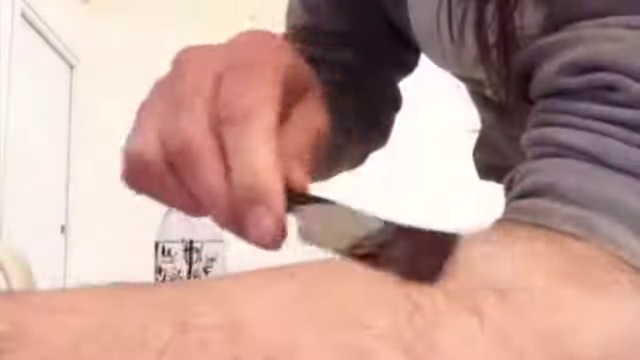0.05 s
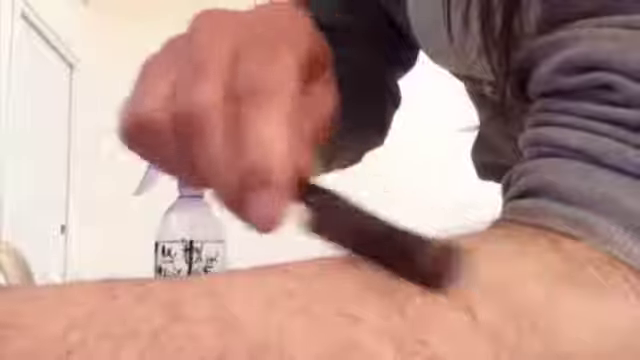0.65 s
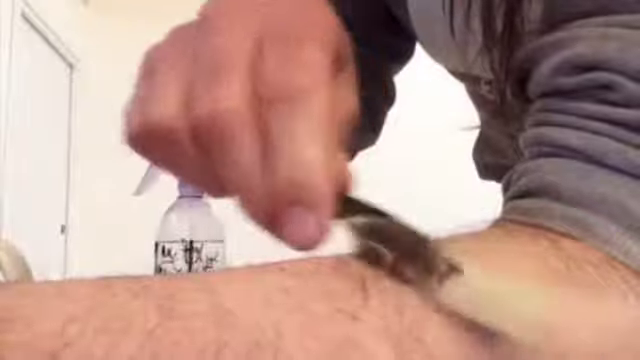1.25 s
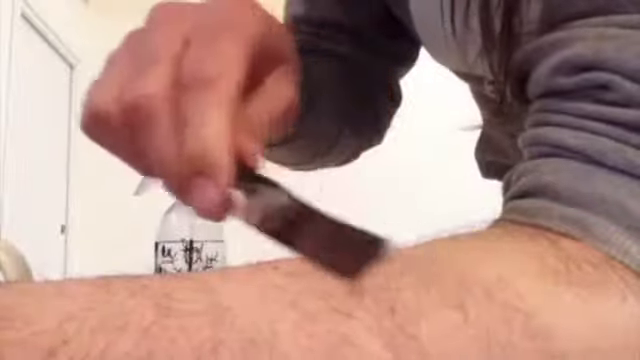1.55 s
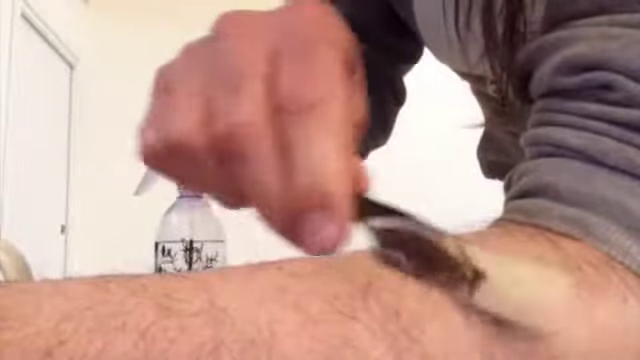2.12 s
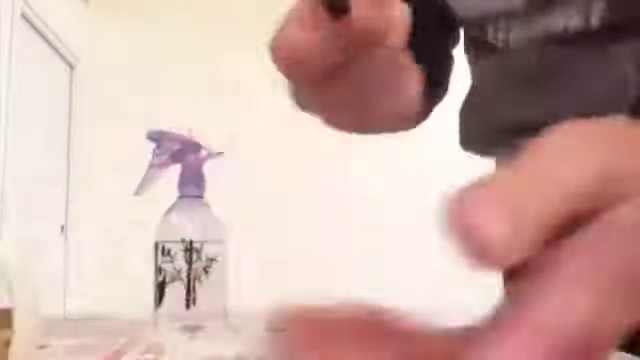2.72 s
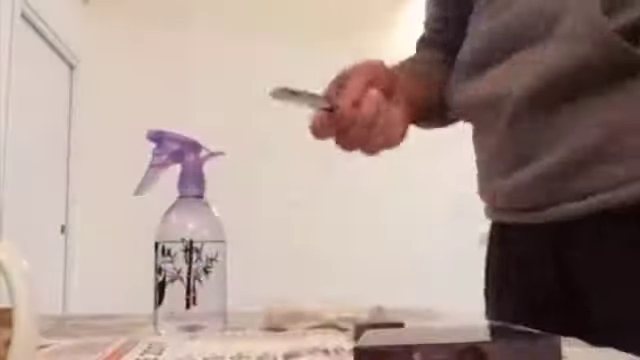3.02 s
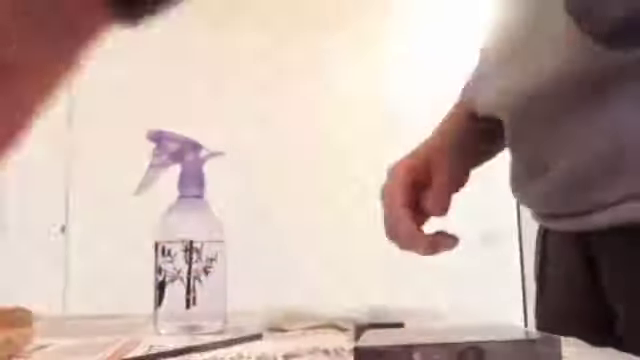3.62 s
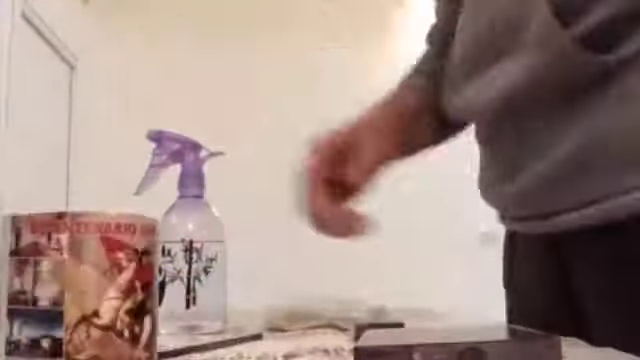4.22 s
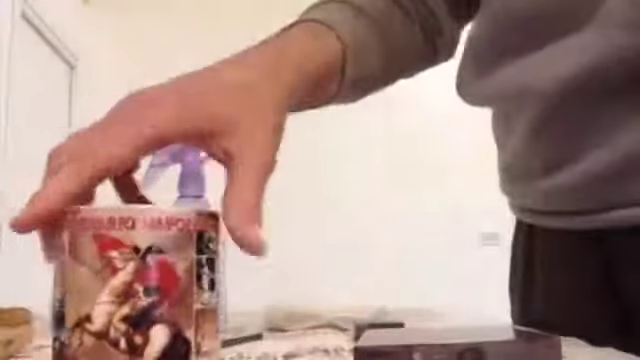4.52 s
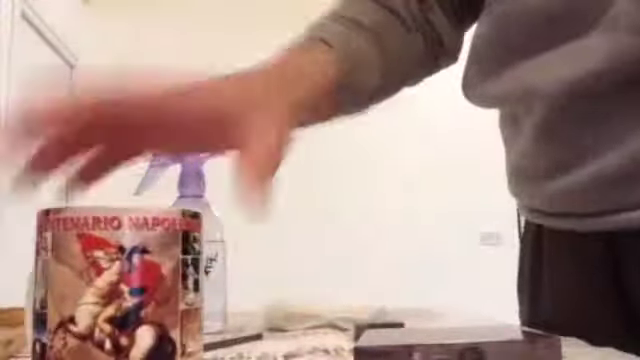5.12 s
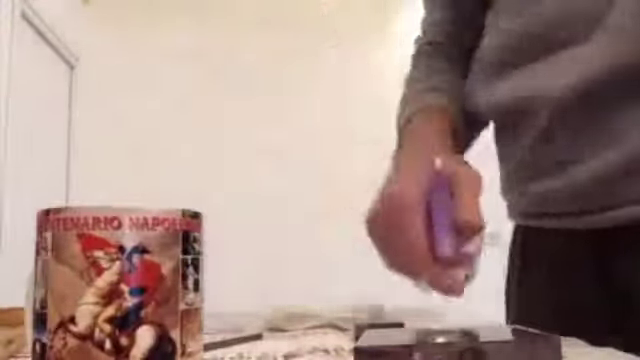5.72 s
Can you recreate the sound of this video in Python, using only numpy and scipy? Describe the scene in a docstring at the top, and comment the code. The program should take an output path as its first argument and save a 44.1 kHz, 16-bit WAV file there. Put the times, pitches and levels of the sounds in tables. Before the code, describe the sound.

A straight razor shaves forearm hair close to the microphone in a small room with low, steady background noise. From the start until about 2.2 seconds come runs of faint, very high hissing strokes, roughly eight to twelve a second, with a whisper of blade on skin and soft drags of the arm on a table. The blade catches with a small metallic tick at 1.1 seconds. A bump and a sharp click come near 2 seconds. At 2.5 seconds a short groaning scrape ends in the loudest sound, a hard knock on the table. Lighter scrapes and taps follow from 3 to 3.4 seconds as the razor is laid down. A sleeve sweeps past around 3.7 seconds. A mug bumps down at 4 seconds and slides faintly, with brief scrapes, until about 5.1. Near 5.7 seconds a plastic spray bottle clicks several times amid soft sleeve swishes.

```python
"""Razor on forearm hair

A straight razor shears hair in short hissing strokes, close to a microphone on a table in a small room.
The arm drags and bumps on the table top, driving its modes by stick-slip friction and by impact.
The razor is laid down and a plastic spray bottle is picked up, each clicking as a small hard shell;
a pushed mug resonates faintly, and sleeves swish past as their fibres rub."""
import sys
import numpy as np
from scipy import signal
from scipy.fft import rfft, irfft
from scipy.io import wavfile
from scipy.ndimage import uniform_filter1d

SR = 44100
rng = np.random.default_rng(int(sys.argv[2]) if len(sys.argv) > 2 else 0)


def materialize(psi):
    """Save the field psi as 16-bit PCM at rate SR to the path in sys.argv[1].

    A 1-D psi becomes a single channel; in a 2-D psi each row is a channel.
    """
    bounded = np.clip(np.atleast_2d(psi).T, -1, 1)
    quanta = np.round(bounded * 32767).astype(np.int16)
    wavfile.write(sys.argv[1], SR, quanta)


N = 262395
T = np.arange(N) / SR

# spectra of room noise, cut hair, rubbed skin and rubbed cloth: f/Hz, relative density level/dB
AIR_SPECTRUM = [(18, -74), (30, -53), (119, -17.5), (200, -3), (394, -14), (485, -11.5), (538, -11),
                (794, -10), (978, -20.5), (2190, -21), (3150, -25), (15000, -30)]
HAIR_SPECTRUM = [(5000, -37), (8000, -5), (9800, -4.5), (10900, 2), (11700, -8), (12600, 8), (13500, 1),
                 (15500, -1)]
SKIN_SPECTRUM = [(500, -1), (1500, 6.5), (2500, 6.5), (4000, -1.5), (7000, -4.5), (15500, -4)]
CLOTH_SPECTRUM = [(150, -1), (800, 1), (1600, 6), (2700, 1.5), (5500, -6), (8500, -1.5), (11500, 3.5),
                  (15000, -5.5)]
# modes of the table top, the razor steel and the razor or bottle shell: f/Hz, level/dB, T60/s
TABLE_MODES = [(87, -4, 0.058), (144, -38, 0.045), (188, -3.5, 0.044), (245, 0.5, 0.026), (325, 21, 0.015),
               (399.2, 0, 0.084), (452, -5, 0.046), (606.5, 3, 0.12), (860, -11, 0.042), (1310, -4, .03)]
STEEL_MODES = [(1310, 2, 0.074), (2227, 4.5, 0.025), (2370, -9, 0.021), (3626, -6.5, 0.041)]
SHELL_MODES = [(1220, -1, 0.031), (1740, -28, 0.0043), (2245, 17.5, 0.037), (2527, 27, 0.0045),
               (3490, -18, 0.054)]
# bouts of even razor strokes: start/s, end/s, rate/Hz, stroke length/s, start level/dB, end level/dB
STROKE_BOUTS = [(0.037, .72, 8.25, 0.036, -65.5, -69.5), (0.789, 1.02, 10.7, 0.031, -65.5, -68),
                (1.16, 1.5, 7.64, 0.1, -71, -76), (1.693, 1.92, 11.9, 0.039, -74, -61.5),
                (1.998, 2.18, 9.1, 0.044, -68.5, -70)]
# drags on the table: t/s, length/s, groan level/dB, weight (thud re groan)/dB, grit re groan/dB
TABLE_DRAGS = [(0.191, .061, -45.5, -2.5, -5.5), (0.261, 0.081, -55, -4.5, -6.5),
               (0.463, 0.028, -59, -11, 0), (0.604, 0.025, -70.5, 0, 7.5), (0.736, 0.023, -57.5, -2, -4.5),
               (1.125, .024, -58.5, -5.5, 11), (1.933, 0.028, -41, -1.5, -12), (1.96, 0.028, -42, 1, -5),
               (2.07, 0.01, -61, -19, 0), (2.389, 0.083, -65, 8, -11), (2.476, 0.037, -34.5, -16.5, -12.5),
               (2.511, 0.048, -29.5, -26.5, -20.5), (2.574, 0.04, -38, -11.5, -13.5),
               (2.746, 0.037, -53, -16, 1), (2.941, 0.05, -51.5, 2, -7.5), (2.998, 0.045, -58.5, -10, -1),
               (3.225, 0.059, -45, -14.5, -2.5), (3.315, 0.04, -45, -9, -4), (3.374, 0.032, -43, -15, -4),
               (3.402, .03, -52.5, -8, -1.5), (3.766, 0.085, -42.5, -17, -4), (4.035, 0.013, -54, -1, -13),
               (4.517, 0.03, -55, -3, -12), (4.552, 0.086, -50.5, -0.5, -9.5),
               (4.635, 0.021, -41.5, -9, -28), (4.815, 0.022, -63, -15, 2.5), (5.384, .028, -52.5, -10, -8),
               (5.565, 0.02, -65.5, -12, 9)]
# blows on the table: t/s, peak level/dB, contact time/ms
TABLE_BLOWS = [(0.73, -45.5, 1.4), (1.38, -57.5, 1.1), (1.948, -38, 1.4), (2.587, -17, 0.69),
               (2.592, -16.5, 1.5), (3.015, -45, 0.71), (3.4, -38.5, 0.39), (4.04, -43, 2),
               (4.152, -56.5, 1.6), (5.236, -50.5, 1.2), (5.758, -48.5, 0.51)]
# sliding contacts of blade on skin, cloth on cloth and mug on table: t/s, length/s, level/dB
SKIN_GLIDES = [(0.36, 0.63, -70.5), (0.865, 0.017, -65.5), (1.01, .1, -64), (1.305, 0.026, -66.5),
               (1.428, 0.097, -69.5), (1.638, 0.013, -70), (2.205, 0.027, -68)]
SLEEVE_SWISHES = [(2.58, .03, -60), (3.828, 0.014, -59), (3.987, .046, -60.5), (4.368, 0.031, -61),
                  (4.41, .096, -68), (4.703, .016, -65), (4.967, 0.017, -65.5), (5.405, 0.036, -65.5),
                  (5.568, 0.021, -59), (5.72, 0.058, -68), (5.873, 0.065, -64.5)]
MUG_SLIDES = [(3.99, 0.035, -65.5), (4.37, 0.65, -80), (5.065, .05, -75)]
# clicks of razor and bottle: t/s, body peak level/dB, snap peak level/dB
SHELL_CLICKS = [(1.962, -24.5, -60), (2.584, -42.5, -56), (3.528, -53.5, -59), (5.139, -54.5, -63),
                (5.691, -46, -54), (5.7064, -48, -33), (5.7582, -48.5, -39.5), (5.799, -53.5, -50)]
# envelope of a sleeve sweeping close past the microphone: t/s, level/dB
SLEEVE_SWEEP = [(3.47, -93), (3.535, -62), (3.575, -60), (3.62, -64.5), (3.66, -52), (3.70, -55),
                (3.735, -53), (3.75, -61.5), (3.85, -87)]


def undb(db):
    """Amplitude ratio of a level in decibels."""
    return 10 ** (np.asarray(db) / 20)


def unit(x):
    """Normalisation to rms 1."""
    return x / np.sqrt(np.mean(x ** 2))


def at_peak(x, db):
    """Normalisation to a peak level."""
    return undb(db) * x / np.abs(x).max()


def add(out, start, x):
    """Superposition of x on out from start/s."""
    i = int(start * SR)
    out[i:i + len(x)] += x[:N - i]


def band(x, lo_hz, hi_hz, order=2):
    """Causal Butterworth band-pass."""
    edges = np.clip([lo_hz, max(hi_hz, lo_hz * 1.1)], 10, .45 * SR)
    return signal.sosfilt(signal.butter(order, edges, "band", fs=SR, output="sos"), x)


def colour(x, spectrum):
    """Spectral shaping by (f/Hz, level/dB) points, to rms 1."""
    hz, db = np.transpose(spectrum)
    f = np.maximum(np.fft.rfftfreq(len(x), 1 / SR), 1)
    gain = undb(np.interp(np.log(f), np.log(hz), db))
    return unit(irfft(rfft(x) * gain, len(x)))


def wander(rate_hz):
    """Slow random modulation of rms 1."""
    hold = int(SR / rate_hz)
    steps = np.repeat(rng.standard_normal(N // hold + 1), hold)
    return unit(uniform_filter1d(steps, hold)[:N])


def grains(samples, rate_hz, spread_db):
    """Shot noise: tiny slips of unequal strength at random moments."""
    hit = rng.random(samples) < rate_hz / SR
    size = undb(spread_db * np.minimum(rng.exponential(size=samples), 4))
    return unit(hit * rng.standard_normal(samples) * size + 1e-9)


def pulse(length, attack, release, samples=SR // 4):
    """Amplitude envelope: exponential rise, hold and exponential release, with times in s."""
    t = T[:samples]
    return (1 - np.exp(-t / attack)) * np.exp(-np.maximum(t - length, 0) / release)


def gestures(rows, attack, release):
    """Summed envelope of contacts given as (t/s, length/s, level/dB)."""
    out = np.zeros(N)
    for start, length, db in rows:
        add(out, start, undb(db) * pulse(length, attack, release, samples=SR))
    return out


def ring(modes, detune):
    """Impulse response of damped modes, each mistuned at random by a relative spread."""
    t = T[:SR // 5]
    out = np.zeros(len(t))
    for hz, db, t60 in modes:
        tuning = 1 + detune * rng.standard_normal()
        out += undb(db - 60 * t / t60) * np.cos(2 * np.pi * hz * tuning * t)
    return out


def background():
    """Broadband room noise wavers in its low part; the fidgeting arm faintly excites the table's modes."""
    noise = colour(rng.standard_normal(N), AIR_SPECTRUM)
    low = signal.sosfiltfilt(signal.butter(2, 900, fs=SR, output="sos"), noise)
    hiss = noise - low
    touches = band(grains(N, rate_hz=60, spread_db=1), 160, 564)
    fidget = unit(signal.fftconvolve(touches, ring(TABLE_MODES, detune=0))[:N])
    rumble = low * undb(2 * wander(22) - 0.5)
    return undb(-68) * (hiss + rumble) + undb(-78) * fidget


def hair_strokes():
    """Fracture noise: hairs snap unevenly against the edge and excite two of its resonances."""
    strokes = [(t, length, np.interp(t, [start, end], [start_db, end_db]))
               for start, end, rate, length, start_db, end_db in STROKE_BOUTS
               for t in np.arange(start, end, 1 / rate)]
    snaps = grains(N, rate_hz=7000, spread_db=1.8)
    edge = unit(band(snaps, 12450, 12800, order=1)) + unit(band(snaps, 10850, 11200, order=1))
    tufts = undb(1.2 * wander(140))
    hiss = colour(snaps, HAIR_SPECTRUM) + undb(-11.5) * edge
    return hiss * gestures(strokes, attack=0.006, release=0.006) * tufts


def drags():
    """Stick-slip friction shakes the table top, makes the dragged object groan and grinds out grit."""
    out = np.zeros(N)
    weight_db_per_octave, grit_db_per_octave, swell_db = -47.5, 25.5, 2
    for start, length, groan_db, weight_db, grit_db in TABLE_DRAGS:
        # a heavier load groans lower; the grit reaches higher with that pitch and with its own level
        pitch = 2 ** (weight_db / weight_db_per_octave)
        groan_hz = 488 * pitch
        top_hz = 2680 * pitch * 2 ** (grit_db / grit_db_per_octave)
        # the sound swells, then its level drops at once to a quieter, quickly fading tail
        envelope = pulse(length, attack=0.00048, release=0.003)
        envelope += undb(-3) * pulse(length, attack=0.0036, release=0.034)
        envelope *= undb(swell_db * np.minimum(T[:len(envelope)] / length, 1))
        envelope /= envelope.max()
        slips = grains(len(envelope), rate_hz=7000, spread_db=0.8) * envelope
        table = signal.fftconvolve(slips, ring(TABLE_MODES, detune=0.14))[:len(slips)]
        thud = band(table, 150.4, 263, order=3)
        groan = band(slips, groan_hz / 1.5, groan_hz * 1.24) + undb(-7) * band(slips, 255, 994, order=3)
        # grit falls off towards the treble and carries the ring of the hard shell
        shell = signal.fftconvolve(slips, ring(SHELL_MODES, detune=0.0625))[:len(slips)]
        grit = unit(band(band(slips, 1000, top_hz, order=4), 250, 1560, order=1))
        grit += undb(-6.5) * unit(shell)
        grit += undb(-21.5) * unit(band(slips, top_hz, 1.51 * top_hz))
        envelope_rms = np.sqrt(np.mean(envelope ** 2))
        for part, db in ((thud, weight_db), (groan, 0), (grit, grit_db)):
            add(out, start, unit(part) * envelope_rms * undb(groan_db + db))
    return out


def knocks():
    """Impact: a blow or a stopping drag rings the table top; longer contact gives a duller sound."""
    out = np.zeros(N)
    stop_over_thud_db, stop_contact_ms = 8, 0.59
    stops = [(start + length, groan_db + weight_db + stop_over_thud_db, stop_contact_ms)
             for start, length, groan_db, weight_db, _ in TABLE_DRAGS]
    for start, db, contact_ms in TABLE_BLOWS + stops:
        progress = T[:SR // 100] / (contact_ms * 1e-3)
        force = progress * np.exp(-4 * progress)
        table = signal.fftconvolve(ring(TABLE_MODES, detune=0.0079), force)
        add(out, start, at_peak(band(table, 74, 2400, order=1), db))
    return out


def skin_glides():
    """Sliding friction: the flat of the blade whispers over the skin."""
    whisper = colour(grains(N, rate_hz=12000, spread_db=-0.5), SKIN_SPECTRUM)
    return whisper * gestures(SKIN_GLIDES, attack=0.0012, release=0.014) * undb(2 * wander(31.48))


def blade_catch(start, length, peak_db):
    """Modal ringing: the edge catches, and its chatter excites the steel."""
    out = np.zeros(N)
    press = pulse(length, attack=0.00081, release=0.0055)
    chatter = grains(len(press), rate_hz=3700, spread_db=6) * press
    steel = signal.fftconvolve(chatter, ring(STEEL_MODES, detune=0.0015))
    add(out, start, at_peak(band(steel, 1560, 3800), peak_db))
    return out


def clicks():
    """Hard contact: a bright snap, and a tiny rattle that excites the modes of a small shell."""
    out = np.zeros(N)
    t = T[:SR // 10]
    for start, body_db, snap_db in SHELL_CLICKS:
        rattle = rng.standard_normal(len(t)) * np.exp(-t / 0.0046)
        shell = signal.fftconvolve(rattle, ring(SHELL_MODES, detune=0.034))[:len(t)]
        body = band(unit(rattle) + undb(-18) * unit(shell), 900, 2360, order=4)
        snap = band(rng.standard_normal(len(t)) * np.exp(-t / 0.0018), 8800, 13700, order=1)
        add(out, start, at_peak(body, body_db) + at_peak(snap, snap_db))
    return out


def sleeves():
    """Friction noise: cloth fibres brush over each other in short swishes and one long sweep."""
    swishes = gestures(SLEEVE_SWISHES, attack=0.008, release=0.011)
    sweep = undb(np.interp(T, *np.transpose(SLEEVE_SWEEP), left=-np.inf, right=-np.inf))
    return colour(grains(N, rate_hz=13000, spread_db=2), CLOTH_SPECTRUM) * (swishes + sweep)


def mug(mode_hz=2230, bandwidth_hz=140):
    """Forced resonance: sliding drives one mode of the mug, damped by the fingers."""
    slips = grains(N, rate_hz=1300, spread_db=6)
    mode = unit(band(slips, mode_hz - bandwidth_hz / 2, mode_hz + bandwidth_hz / 2))
    return mode * gestures(MUG_SLIDES, attack=0.007, release=0.0082)


def room(x, t60, wet_db):
    """Reverberation: a short diffuse tail with little treble follows the direct sound."""
    t = T[:SR // 2]
    reflections = rng.standard_normal(len(t)) * undb(-60 * t / t60) * (t > 0.006)
    tail = band(reflections, 210, 6700, order=1)
    return x + undb(wet_db) * signal.fftconvolve(x, tail / np.linalg.norm(tail))[:N]


def scene():
    """Superposition: the sources share one room and add to its background, in mono."""
    direct = drags() + knocks() + clicks() + hair_strokes() + skin_glides()
    direct += blade_catch(start=1.127, length=0.011, peak_db=-36) + sleeves() + mug()
    return (room(direct, t60=0.21, wet_db=-20) + background())[None]


def record(dry):
    """Band limiting: a steep elliptic low-pass removes the highest treble."""
    cutoff_hz = 15450
    return signal.sosfilt(signal.ellip(10, .2, 70, cutoff_hz, fs=SR, output="sos"), dry)


dry = scene()
out = record(dry)
materialize(out)
```